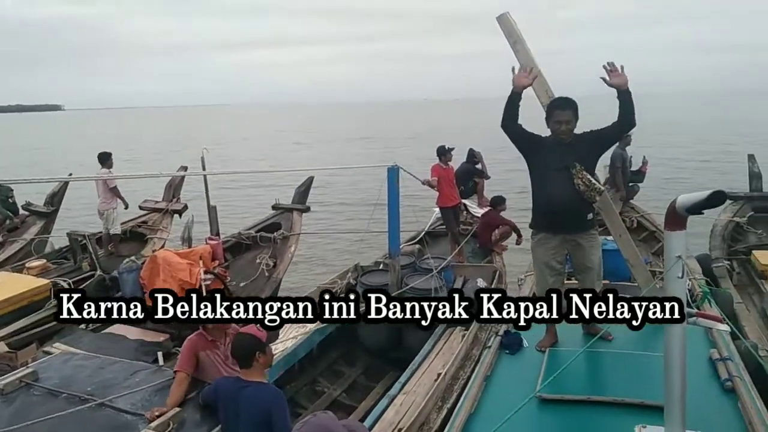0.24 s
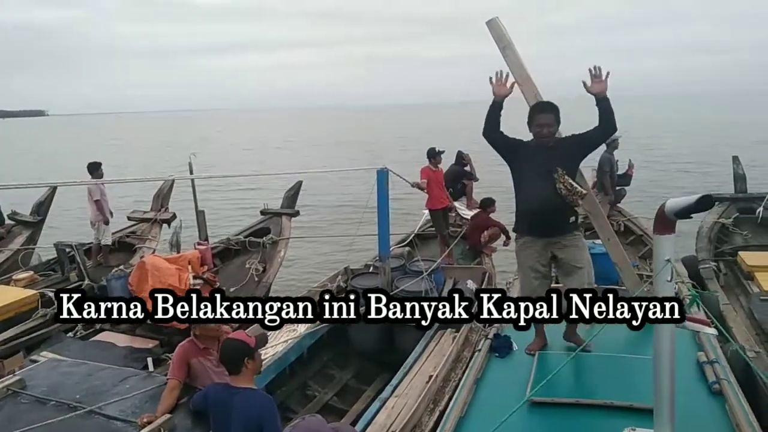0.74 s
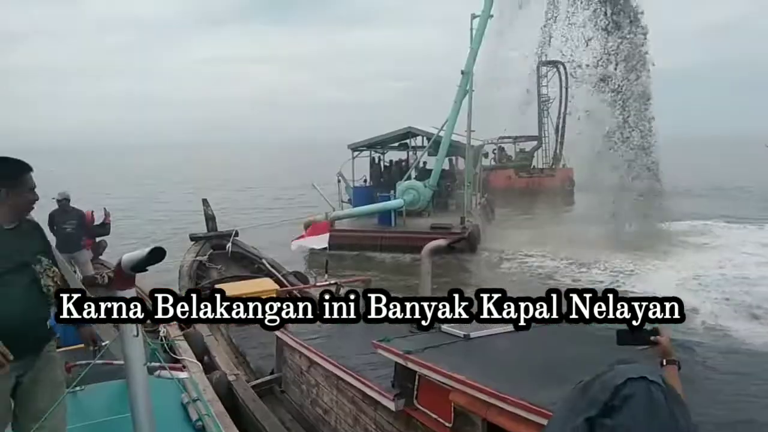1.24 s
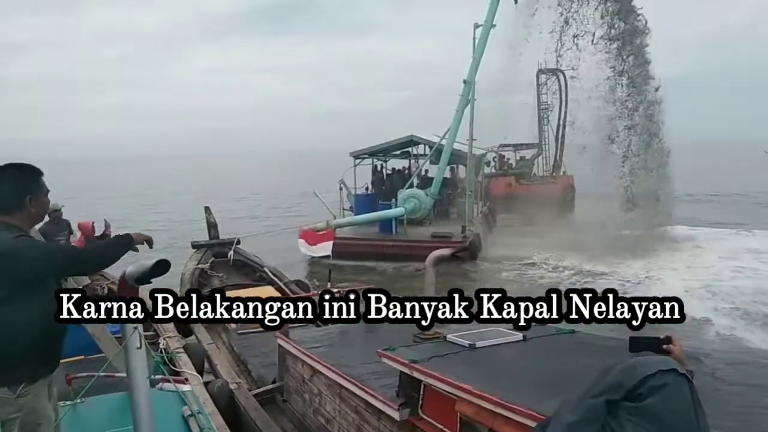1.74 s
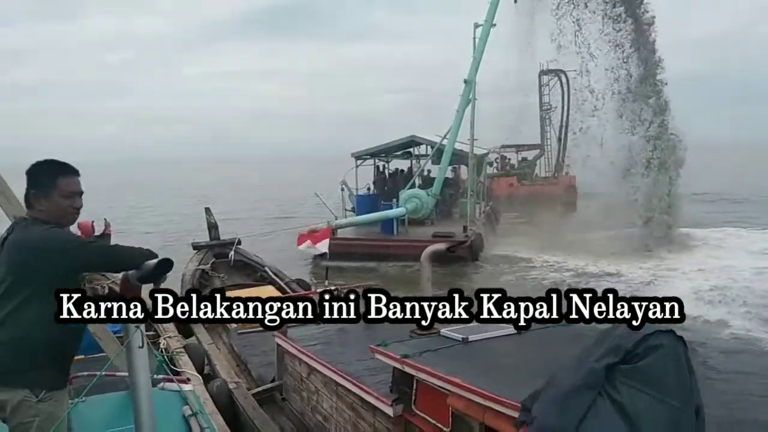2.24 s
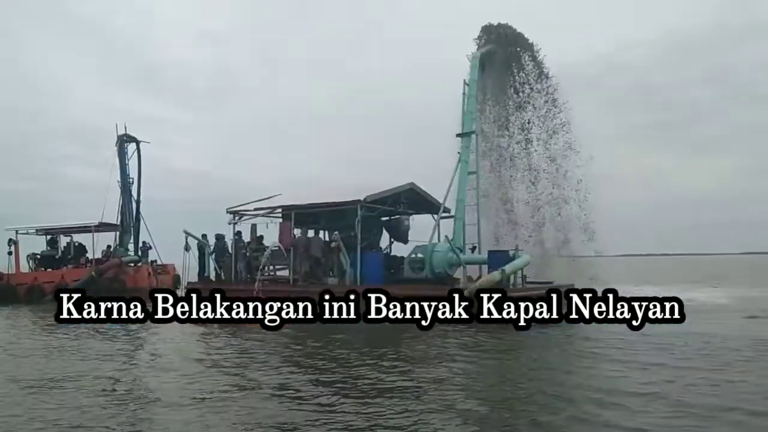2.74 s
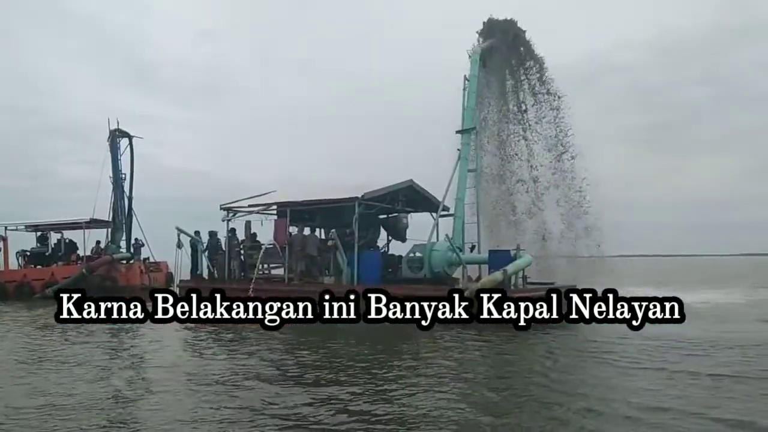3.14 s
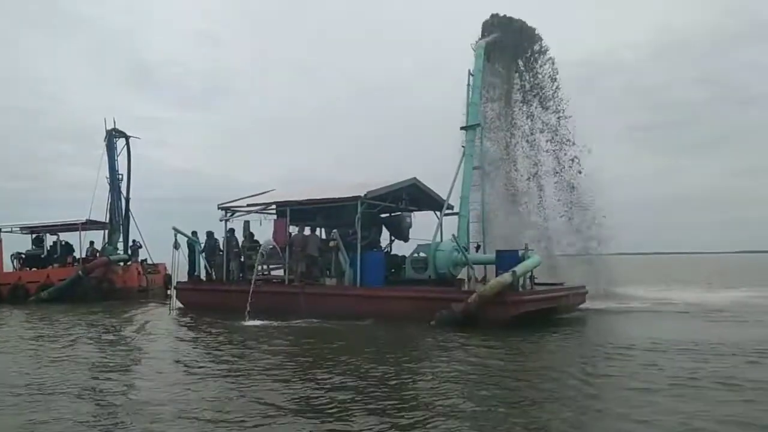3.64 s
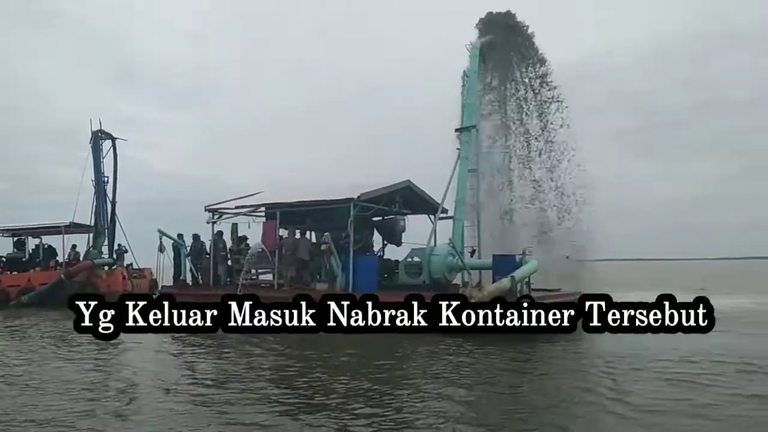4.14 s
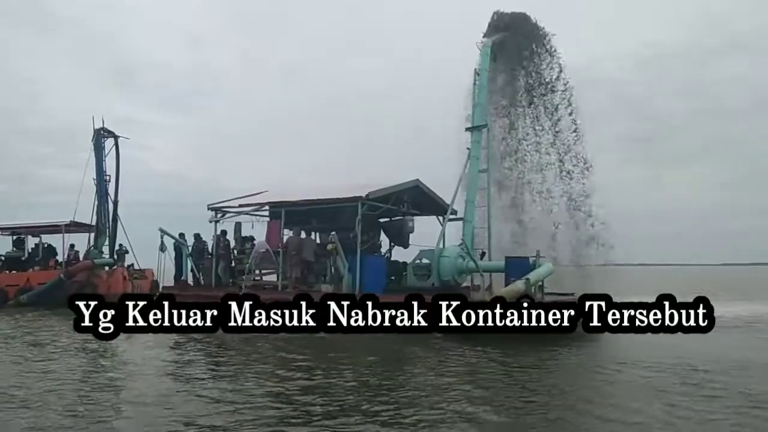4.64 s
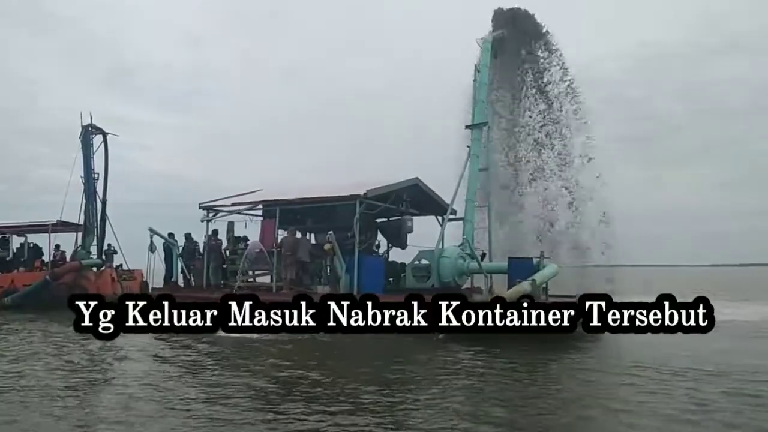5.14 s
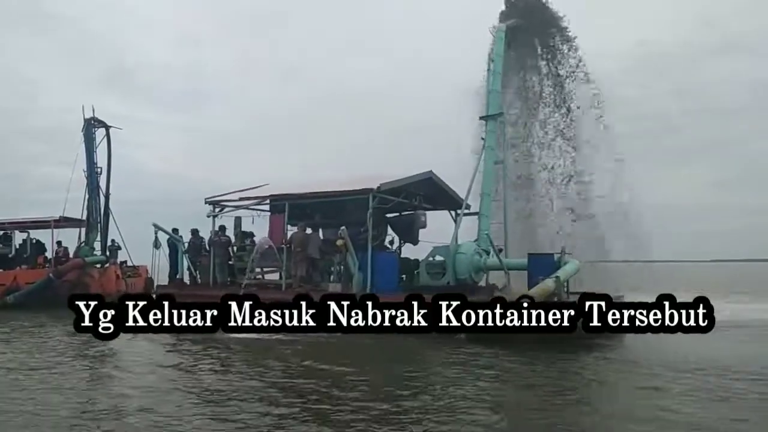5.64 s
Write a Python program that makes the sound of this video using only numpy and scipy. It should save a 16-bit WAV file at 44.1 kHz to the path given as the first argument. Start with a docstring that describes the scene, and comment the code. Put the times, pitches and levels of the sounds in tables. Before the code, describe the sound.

A dredger's big diesel engine runs at a steady speed on a river, its open exhaust throbbing and rasping while a jet of slurry rushes onto the water. The microphone is among moored boats, and the tone shifts abruptly after a second. Just past two seconds the sound drops to silence, with one tiny blip. The engine then fades quickly back in, close by, with a heavier throb and irregular sharp metallic cracks.

```python
"""Sand dredger on the river

An eight-cylinder diesel drives the pump at a steady speed. Uneven firings throb, ring the open exhaust
and crack with escaping gas; the slurry jet rushes down beside it. The microphone stands at two places
among the moored boats, then close by, with a hard cut between the first two. A short silence with
one blip in it comes before the close place fades in."""
import sys
import numpy as np
from scipy import signal
from scipy.fft import rfft, irfft
from scipy.io import wavfile
from scipy.ndimage import uniform_filter1d

SR = 44100
rng = np.random.default_rng(int(sys.argv[2]) if len(sys.argv) > 2 else 0)


def transcribe(u):
    """Save the signal u as a 16-bit wav file named by the first command-line argument.

    u: samples, shape (n,) or (channels, n), limited to [-1, 1]; the rate is SR.
    q: integer samples, one column per channel.
    """
    v = np.clip(np.atleast_2d(u).T, -1, 1)
    q = np.round(v * 32767).astype(np.int16)
    wavfile.write(sys.argv[1], SR, q)


N = 260190

# microphone places, the last close by: from t/s, to t/s, firing rate/Hz, reference firing t/s
PLACES = [(0, .965, 63.38, -.001), (.965, 2.263, 63.72, .011), (2.468, 5.91, 64.62, .0015)]
# balance at each place: level/dB of rumble, bark, pipe tones, rasp, crack and slurry;
# steady share of the gas noise (0-1), firing at which the throb is heaviest
BALANCE = [(-30, -28, 1.5, -27.5, -30.5, -33, 0.55, 1.24), (-31, -29, -0.7, -28, -30, -34.5, 0.54, 1.27),
           (-30, -29, -3.5, -26, -25.5, -32, 0.1, 5.35)]
# low throbbing exhaust tones that stay in step, each at its own level:
# multiple of the engine cycle, level/dB from the boats, level/dB close by
THROB_TONES = [(8, -30, -27.5), (13, -31.5, -33), (16, -33, -27), (21, -72.5, -36), (26, -55.5, -40),
               (28, -50, -40.5), (31, -72, -48), (32, -40, -32), (33, -42.5, -33), (34, -58.5, -58),
               (39, -44.5, -43), (48, -53, -53)]
# cylinders in firing order, from the boats, then close by: level/dB of bark and rumble, rasp, crack
CYLINDERS = [
    [(-7.5, 10, 2), (-6.5, 6.5, 2.5), (-9.5, -0.5, -10), (-7.5, -9.5, -9), (-8, 4, 2.5), (-5, 7.5, 4),
     (-7.5, 6, -3.5), (-3.5, 6, -3)],
    [(-8, -7.5, 6.5), (-6.5, -9.5, 4), (-8.5, -6, 4.5), (-8, -7, 3.5), (-6, -7, 1.5), (-9.5, -6, 3),
     (-6, -10.5, -2.5), (-6.5, -9.5, -4)],
]
# each port's path to the pipe mouth, in firing order: lag/ms
PORT_LAG_MS = [1.503, -0.733, 0.508, -1.583, .4, 1.05, -.3, 0.505]
# low exhaust rumble, with the 36 Hz hum of another engine idling;
# from the boats, then close by: f/Hz, relative level/dB
RUMBLE_SPECTRA = [
    [(15, -27.5), (28, -19), (36, 7), (46, -20.5), (80, 3), (130, 3.5), (190, -2), (260, 0), (330, -.5),
     (440, -13), (700, -44.5)],
    [(28, -16), (36, 9), (46, -19), (80, 4), (160, 6.5), (240, -2.5), (330, -4), (440, -15), (700, -48)],
]
# the exhaust at each place: f/Hz, relative level/dB
BARK_SPECTRA = [
    [(260, -41), (450, -9.5), (507, -19.5), (570, -5.5), (616, -12), (750, -0.5), (815, -6.5), (885, -1.5),
     (960, -6.5), (1060, -27), (1430, -38.5), (2420, -120)],
    [(260, -38.5), (450, -17), (553, -3), (734, -4), (923, -1.5), (1030, -34), (1100, -12), (1430, -14),
     (2420, -120)],
    [(260, -42), (450, -21), (523, -13.5), (593, -2.5), (720, -4), (780, -10), (850, -3.5), (937, -14.5),
     (1100, -26), (1430, -62), (2420, -120)],
]  # the pipe's lowest ring
RASP_SPECTRA = [
    [(650, -36), (1100, -10.5), (1230, -23.5), (1330, -0.5), (1860, -7.5), (2030, -3), (2570, -3),
     (3040, -9), (3600, -12), (4680, -66), (7920, -120)],
    [(650, -33), (1100, -7.5), (1330, 2), (1500, -7), (1780, -4.5), (2250, -2.5), (2430, -3.5), (2620, -2),
     (2760, -6), (3000, -1), (3600, -9.5), (4680, -49), (7920, -120)],
    [(650, -29.5), (1100, -24), (1220, -3), (1350, -6), (1450, 2), (1590, -5.5), (1830, -6), (1950, -9),
     (2110, -5), (2520, -4.5), (2710, -2.5), (3070, -4), (3700, -6), (4810, -60), (8140, -120)],
]  # its higher rings
CRACK_SPECTRA = [
    [(2120, -27.5), (3600, -10), (4790, -1), (5440, 3), (7120, -4), (9670, -25), (13000, -35)],
    [(2120, -32.5), (3600, -8.5), (4320, -4.5), (4860, -8), (6200, -9), (6850, -2.5), (7500, -1.5),
     (8150, -2.5), (9000, -12), (13000, -37)],
    [(2180, -19), (3700, -13.5), (3850, -7), (4200, 2.5), (4560, -3), (4900, -1), (5590, -9), (6250, -10),
     (7980, -8.5), (8980, -16), (12500, -49), (16200, -78), (22000, -120)],
]  # the gas jet at its mouth
# pipe resonances at each place: f/Hz, level/dB, firing that sets it off, fall over the cycle/dB,
# pulsing with each firing/dB, phase wander/rad, level drift/(dB/s)
PIPE_TONES = [
    [(828, -33.5, 6.8, 11, 8.5, 1, -6), (1600, -37, 6.3, 31, 8.5, 0.56, 0.5),
     (2010, -38, 5.5, 11, 2, 0.83, 1), (2545, -37, 3.8, 21.5, 8.5, 0.93, -1.5)],
    [(757, -33.5, 6, 17, 4.5, 1.6, 1), (1295, -37, 7.7, -3, 11, 0.87, -12),
     (2280, -38, 7.3, 11.5, 6, 0.51, -4.5), (2886, -33.5, 4.6, 9.5, 8, 0.32, -4)],
    [(775.5, -25.5, 2.15, 24.5, 3, 0.63, 0), (1486, -39, 2.5, 21, -3, 0.6, 4),
     (1790, -33, 2.6, 5, 1, 0.43, -2), (2693, -31, 7.7, 22, 0, 0.53, 3), (3080, -30.5, 7.8, 10, 8, 0.7, -4)],
]
# slurry falling on the river: f/Hz, relative level/dB
SLURRY_SPECTRUM = [(100, -2), (400, -3), (1100, 0.5), (3000, -9.5), (7500, -9), (10000, -20), (12500, -40),
                   (14000, -84)]
# slow rise and fall of the pipe's boom, rasp and crack: t/s, level/dB
BOOM_LEVEL = [(0, 2), (2.8, -1), (3.25, -5.5), (4.0, -0.5), (4.45, 1), (4.85, -0.5), (5.2, -1.5), (5.7, -1)]
RASP_LEVEL = [(0, -2.5), (1.55, 1), (1.75, 1), (2.8, 0), (3.5, 0), (4.95, 0.5), (5.2, 4), (5.4, 1.5),
              (5.85, 4)]
CRACK_LEVEL = [(0, 1.5), (2.7, -0.5), (3.75, -1), (4.25, -0.5), (4.9, 0), (5.1, 0.5), (5.85, -1.5)]
# brief exhaust swells and dips: t/s, level/dB of bark and low pipe tones, level/dB of high pipe tones
SURGES = [(1.02, -1.5, 0), (1.38, 1.5, 4), (1.51, 2, 6), (2.13, -1.5, -9), (3.54, 4, 5), (3.79, 3, -5),
          (4.52, 2.5, 4), (4.64, 2.5, 3.5), (5.6, -2.5, -4)]
# firings that stand out: t/s, peak level/dB, ring f/Hz
HARD_FIRINGS = [(1.224, -18.5, 7400), (1.851, -22, 7960), (1.883, -21, 7500), (1.978, -23, 7250),
                (2.514, -23, 4300), (2.608, -14.5, 4220), (2.638, -20, 3120), (2.684, -15, 4300),
                (2.732, -16, 4070), (2.855, -18, 4700), (3.102, -18.5, 4730), (3.240, -17, 4820),
                (3.257, -14.5, 4200), (3.362, -18, 4810), (3.734, -20, 4200), (3.980, -16, 4360),
                (4.135, -19, 4140), (4.214, -17.5, 2920), (4.228, -18, 4890), (4.340, -25, 4230),
                (4.418, -15, 4580), (4.478, -15, 4200), (4.589, -17, 4970), (4.601, -19, 4150),
                (4.847, -17.5, 4830), (4.958, -16, 4970), (5.037, -13, 4250), (5.081, -13, 4720),
                (5.162, -16.5, 4570), (5.206, -16, 4740), (5.284, -22, 5100), (5.454, -13.5, 4800),
                (5.484, -15, 4350)]
# the second place, heard for an instant in the silence: t/s, gain (0-1)
BLIP = [(2.392, 0), (2.393, 0.97), (2.404, 0.59), (2.412, 0)]


def undb(db):
    """Decibels to gain."""
    return 10 ** (np.asarray(db) / 20)


def unit(x):
    """Scale to rms 1."""
    return x / np.sqrt(np.mean(x ** 2))


def curve(table, t):
    """A table's (time, value) points joined by straight lines."""
    return np.interp(t, *np.transpose(table))


def walk(t, rate):
    """Slow chance with a spread near 1 and `rate` new values per unit of t."""
    return np.interp(t * rate, np.arange(4096), 1.44 * rng.standard_normal(4096))


def ring(x, spectrum, size=8192):
    """Minimum-phase filter shaped by (f/Hz, level/dB), so that peaks ring after each push; rms 1."""
    hz, db = np.transpose(sorted(spectrum))
    bin_hz = np.arange(size // 2 + 1) * SR / size
    gain = undb(np.interp(np.log(bin_hz + 1), np.log(hz), db))
    cepstrum = irfft(np.log(gain))
    cepstrum[1:size // 2] *= 2
    cepstrum[size // 2 + 1:] = 0
    impulse = irfft(np.exp(rfft(cepstrum)))
    return unit(signal.fftconvolve(x, impulse)[:len(x)])


def throb(t, firings, close, waver_db=0.65, fall_db_per_octave=7):
    """Low exhaust tones in step, each at its own level; unequal cylinders add scattered ones between."""
    in_step = {round(multiple): near if close else far for multiple, far, near in THROB_TONES}
    between_db = -37 if close else -45
    out = 0
    for multiple in range(min(in_step), max(in_step) + 1):
        db = in_step.get(multiple, between_db - fall_db_per_octave * np.log2(multiple / 8))
        if 31 <= multiple <= 34:  # these boom in the pipe
            db = db + curve(BOOM_LEVEL, t)
        lag = 2 * np.pi * rng.random() * (multiple not in in_step)
        wave = np.cos(2 * np.pi * multiple * firings / 8 + lag)
        out = out + np.sqrt(2) * undb(db + waver_db * walk(firings, 0.13)) * wave
    return out


def puffs(firings, cylinder_db, steady, rise, sharpness, whistle_db=1.0, whistle_step_hz=300):
    """Gas let out once a firing, over a steady hiss: each puff peaks in about `rise` firings and fades."""
    size, scatter_db = 2048, 0.57
    starts = np.flatnonzero(np.diff(np.floor(firings)) > 0)
    cylinder = np.floor(firings[starts + 1]).astype(int) % 8
    port_lag = np.round(np.array(PORT_LAG_MS)[cylinder] * SR / 1000).astype(int)
    starts = np.maximum(starts + port_lag, 0)
    stretch_db, strength = rng.standard_normal((len(starts), 2)).T
    # the jet whistles at a few pitches that change from puff to puff
    patches = np.clip(rng.standard_normal((len(starts), 256)), -2, 2)
    bins = np.arange(size // 2 + 1) * SR / size / whistle_step_hz
    colour = undb(whistle_db * np.array([np.interp(bins, np.arange(256), p) for p in patches]))
    # a whistle takes its strength from the pitches around it
    colour /= np.sqrt(uniform_filter1d(colour ** 2, size=81, axis=1))
    gas = irfft(rfft(rng.standard_normal((len(starts), size))) * colour)
    age = np.arange(size) * np.mean(np.diff(firings)) / (rise * undb(stretch_db)[:, None])
    gas *= (age * np.exp(1 - age)) ** (sharpness / 2)
    gas *= undb(cylinder_db[cylinder] + scatter_db * strength)[:, None]
    samples = starts[:, None] + np.arange(size)
    train = np.bincount(samples.ravel(), gas.ravel(), len(firings))[:len(firings)]
    return np.sqrt(1 - steady) * unit(train) + np.sqrt(steady) * rng.standard_normal(len(firings))


def pipe_tones(t, firings, tones, low_db, high_db, flutter_db=1.0, high_above_hz=2500):
    """A run of cylinders sets off each resonance once a cycle; it pulses with the firings."""
    rise_firings, lag_firings, fall_power = 0.91, 0.17, 0.82
    out = 0
    for hz, db, onset, fall_db, pulse_db, wander, drift_db_per_s in tones:
        age = (firings - onset) % 8
        cycle_db = -fall_db * np.maximum(1 - age / rise_firings, (age / 8) ** fall_power)
        firing_db = pulse_db * np.cos(2 * np.pi * (firings - lag_firings))
        swell = undb(cycle_db + firing_db + drift_db_per_s * t + flutter_db * walk(t, 30))
        pitch = hz * (1 + .006 * walk(t, 14))  # drifts with the heat of the gas
        phase = 2 * np.pi * np.cumsum(pitch) / SR + wander * (walk(t, 70) + hz / 1500 * walk(t, 150))
        surge_db = high_db if hz > high_above_hz else low_db
        out = out + undb(db + surge_db) * unit(swell * np.sin(phase))
    return out


def slurry(t, drop_db=3.5, surge_db=1.06):
    """Countless drops and clods hit the river, in slow surges."""
    drops = rng.standard_normal(len(t)) * undb(drop_db * np.minimum(rng.exponential(size=len(t)), 4))
    return ring(drops, SLURRY_SPECTRUM) * undb(surge_db * walk(t, 6.6))


def surges(t, half_length_s=0.045):
    """The exhaust briefly swells or dips: level/dB for its low and its high rings."""
    peak_s, low_db, high_db = np.transpose(SURGES)
    bumps = np.exp(-((t[:, None] - peak_s) / half_length_s) ** 2)
    return bumps @ low_db, bumps @ high_db


def hard_firings(t, place, rise_s=.0019, ring_share=0.63):
    """A few firings burn much harder: each cracks and briefly rings the pipe mouth at its own pitch."""
    gas = ring(rng.standard_normal(len(t)), CRACK_SPECTRA[place])
    wander = 0.39 * walk(t, 600)
    out = np.zeros(len(t))
    for peak_s, db, hz in HARD_FIRINGS:
        span = np.abs(t - peak_s) < .03
        from_peak = t[span] - peak_s
        age = np.maximum(1 + from_peak / rise_s, 0)
        tone = np.sqrt(2) * np.sin(2 * np.pi * hz * from_peak + wander[span])
        burst = np.sqrt(ring_share) * tone + np.sqrt(1 - ring_share) * gas[span]
        out[span] += undb(db) * age * np.exp(1 - age) * burst
    return out


def fade_in(age, throb_rise_s=0.28, rest_rise_s=0.025, held_s=0.15, held_db=-8.5):
    """Close by, the throb rises smoothly; the rest enters quickly, is held down at first, then opens."""
    throb_gain = np.clip(age / throb_rise_s, 0, 1) ** 1.3
    rest_gain = np.clip(age / rest_rise_s, 0, 1) * undb(held_db * (age < held_s))
    return throb_gain, rest_gain


def dredger(t, place):
    """Engine and slurry jet as they reach the microphone at one place."""
    start, _, firing_hz, reference_s = PLACES[place]
    rumble_db, bark_db, tones_db, rasp_db, crack_db, slurry_db, steady, heaviest = BALANCE[place]
    close = place == 2
    bark_cylinders, rasp_cylinders, crack_cylinders = np.transpose(CYLINDERS[close])
    firings = (t - reference_s) * firing_hz + 0.023 * walk(t, 20)  # running count; the crank wavers
    low_db, high_db = surges(t)
    gas = puffs(firings, bark_cylinders, steady, rise=0.25, sharpness=1.2)
    rumble = undb(rumble_db) * ring(gas, RUMBLE_SPECTRA[close])
    gas = puffs(firings, bark_cylinders, steady / 4, rise=0.18, sharpness=1.0)
    bark = undb(bark_db + low_db) * ring(gas, BARK_SPECTRA[place])
    gas = puffs(firings, rasp_cylinders, steady, rise=0.18, sharpness=0.71,
                whistle_db=7.5, whistle_step_hz=150)
    rasp = undb(rasp_db + curve(RASP_LEVEL, t)) * ring(gas, RASP_SPECTRA[place])
    # the crack breaks out just after the port opens
    gas = puffs(firings - .06, crack_cylinders, steady, rise=0.12, sharpness=0.94,
                whistle_db=6, whistle_step_hz=278.6)
    crack = undb(crack_db + curve(CRACK_LEVEL, t)) * ring(gas, CRACK_SPECTRA[place])
    tones = undb(tones_db) * pipe_tones(t, firings, PIPE_TONES[place], low_db, high_db)
    bass = throb(t, firings - heaviest, close)
    rest = rumble + bark + tones + rasp + crack + undb(slurry_db) * slurry(t)
    throb_gain, rest_gain = fade_in(t - start) if close else (1, 1)
    return throb_gain * bass + rest_gain * rest + hard_firings(t, place)


def scene():
    """The three places one after another; the second returns for a blip in the silence."""
    time = np.arange(N) / SR
    out = np.zeros(N)
    for place, (start, end, _, _) in enumerate(PLACES):
        span = (time > start - .1) & (time < end + .2)
        t = time[span]
        heard = 1. * ((t >= start) & (t < end))
        if place == 1:
            heard += curve(BLIP, t)
        out[span] += heard * dredger(t, place)
    return out[None]


def record(dry, drive=0.74, top_hz=13000):
    """One microphone, mono: it rounds the loudest peaks, and the top is cut."""
    lowpass = signal.ellip(8, .2, 70, top_hz, fs=SR, output="sos")
    return signal.sosfilt(lowpass, np.tanh(drive * dry) / drive)


dry = scene()
out = record(dry)
transcribe(out)
```